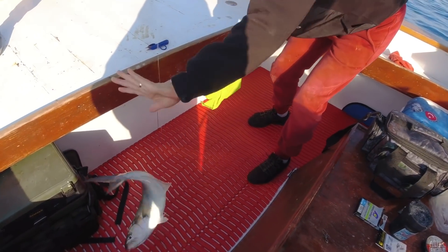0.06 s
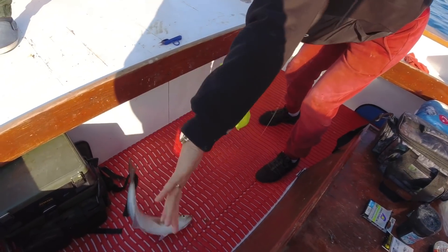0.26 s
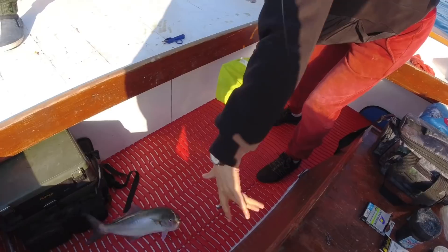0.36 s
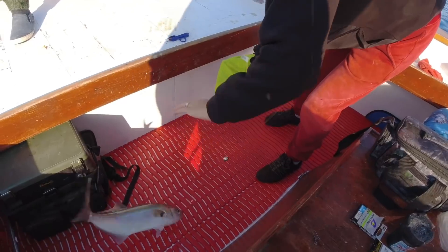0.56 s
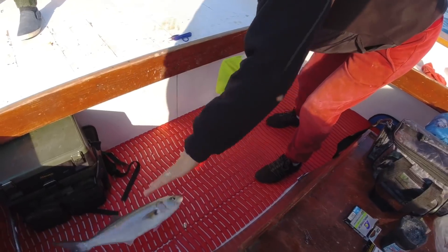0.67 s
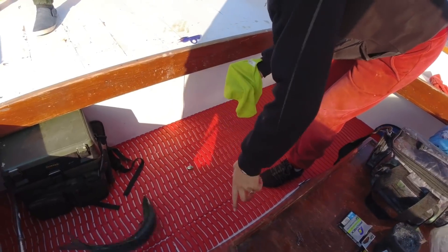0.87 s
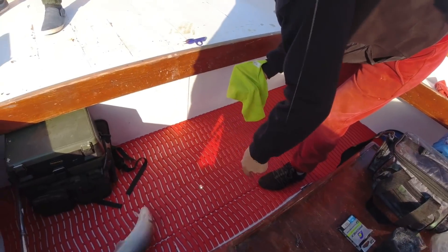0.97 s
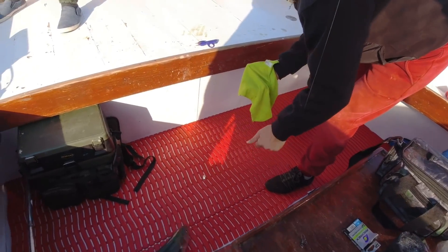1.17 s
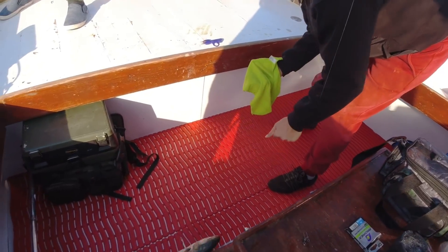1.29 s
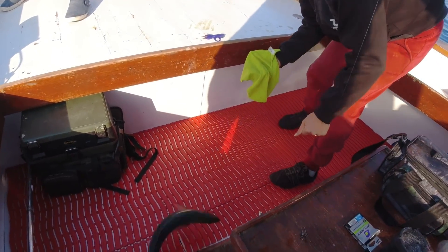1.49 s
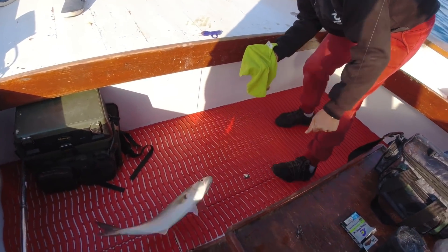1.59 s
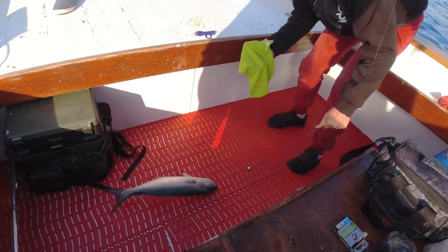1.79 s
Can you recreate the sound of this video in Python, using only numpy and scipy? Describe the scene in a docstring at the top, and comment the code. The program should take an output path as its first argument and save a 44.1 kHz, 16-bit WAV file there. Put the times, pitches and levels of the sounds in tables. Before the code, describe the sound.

A fish thrashes on the matted deck of a small open boat, wet slaps and hollow thumps in a quick flurry, then separate hard blows, recorded close in stereo over faint sea wash and hum.

```python
"""A wet fish thrashes on the ribbed mat of a small open boat: noise bursts smack and sharp clicks snap.
Little air pockets pop, the body thumps the hollow deck, and hard tail blows make the boards ring.
Pops, thumps and ringing boards are sine waves; the cockpit scatters each smack as fading noise.
Wet skin crackles and squeaks as it slides, over filtered noise for the sea and a faint hum of sines."""
import sys
import numpy as np
from scipy import signal
from scipy.fft import rfft, irfft
from scipy.io import wavfile
from scipy.ndimage import uniform_filter1d, map_coordinates

SR = 44100
rng = np.random.default_rng(int(sys.argv[2]) if len(sys.argv) > 2 else 0)


def waveform_to_disk(signal):
    """Save audio, clipped to [-1, 1], as 16-bit WAV at the path in sys.argv[1]."""
    frames = np.transpose(np.atleast_2d(signal))
    scaled = np.clip(frames, -1, 1) * 32767
    samples = np.round(scaled).astype(np.int16)
    wavfile.write(sys.argv[1], SR, samples)


N = 81585

# Tone of the sea wash: pitch_hz, level_db (relative)
SEA_COLOUR = [(20, -7), (40, 7), (70, 1.5), (130, -1.5), (200, -9.5), (400, -18), (1000, -21),
              (2000, -34.5), (4000, -38.5), (9000, -49), (15000, -58.5)]
SEA_DB, SEA_SWELL_DB = -52, 2
# Faint machine hum: pitch_hz, level_db
HUM = [(220, -70.5), (312, -64), (624, -73.5), (937, -67)]
HUM_WAVER, HUM_FLUTTER_DB = 0.007, 2  # waver is a fraction of the pitch

# Wet skin sliding on the mat: start_s, length_s, level_db
SLITHERS = [(0.177, 0.16, -56), (0.32, 0.065, -52), (0.463, 0.034, -37), (0.485, 0.05, -58),
            (0.861, 0.06, -48), (0.95, 0.024, -66), (1.06, 0.135, -60), (1.19, 0.24, -51),
            (1.374, 0.24, -56)]
# Tone of the sliding: pitch_hz, level_db (relative)
SLITHER_COLOUR = [(200, 0), (700, 11.5), (1400, -5.5), (3000, 3.5), (5000, -10), (8000, -15),
                  (15000, -23.5)]
DROPS_PER_S, DROP_SPREAD_DB = 2200, 3
# Rubbery squeaks of skin on the mat: start_s, length_s, starting_pitch_hz, rise_octaves, level_db
SQUEAKS = [(0.35, 0.017, 533, 0.07, -27.5), (.379, 0.0262, 527, 0.56, -23.5),
           (.382, 0.0086, 1235, 0, -31.5), (.871, 0.0094, 2330, 0.175, -40), (1.024, 0.018, 1340, 0, -50),
           (1.155, 0.017, 1200, .18, -38.5), (1.182, 0.007, 1095, 0, -31)]
SQUEAK_WAVER = 0.04  # fraction of the pitch

# Hard tail blows on the boards: start_s, level_db, place (0 to 2 along the deck)
WHACKS = [(0.4791, -28.5, 0.062), (.618, -30, 0), (0.8152, -26.5, 0), (1.336, -26.5, 1),
          (1.5538, -27, 1.87)]
# Ringing tones of the boards: pitch_hz, level_db at place 0, at place 1, at place 2
BOARDS = [(280, -0.5, 5, 4.5), (314.5, -2, -14, 8.5), (369.8, 2, -12.5, 1), (497, -1, -3.5, -20),
          (582.5, -5, 7, 1), (646.5, -7.5, 0, 0.5), (732, -22, 0.5, 2), (771.5, -2.5, 0.5, 2),
          (948, -5.5, -26, 3.5), (1039, -13.5, 2.5, 0), (1114, -15, -17, -2), (1265, -25, 2, -33),
          (1510, -19, -4, 1), (1802, -10, -6.5, -7)]
BOARD_T60_S = 0.12  # time to fade by 60 dB

# Body landing on the deck: start_s, thump_db, pitch_hz, contact_s, deck_ring_db, hull_boom_db
THUMPS = [(.002, -40, 71, 0.014, -47, -53.5), (0.2094, -18.5, 114.3, 0.014, -27.5, -35),
          (0.3129, -14.5, 83, 0.013, -33, -30), (0.3322, -21, 120, 0.016, -24, -30.5),
          (.350, -17.5, 142, 0.01, -41, -37), (0.373, -22.5, 120, .028, -50, -30),
          (0.411, -32.5, 225, 0.01, -54, -50), (0.477, -20.5, 153, 0.01, -33, -40),
          (0.626, -19, 124, 0.013, -24, -29), (0.813, -7.5, 126.4, 0.019, -15.5, -31),
          (0.962, -36, 74.4, 0.034, -51.5, -47), (1.095, -31.5, 131, 0.0075, -39, -60),
          (1.181, -34, 130, 0.011, -39.5, -57), (1.2315, -19.5, 132.4, .028, -31.5, -33),
          (1.35, -41, 120, 0.016, -27.5, -38.5), (1.4442, -19, 123, 0.03, -27, -35),
          (1.566, -27, 104, 0.018, -69, -39), (1.678, -44, 128, 0.018, -43, -64),
          (1.737, -39, 123, 0.017, -38.5, -33), (1.787, -28.5, 104, 0.013, -40.5, -42)]
THUMP_ATTACK_S, THUMP_RELEASE_S, RING_ATTACK_S = 0.0045, 0.0021, 0.023
# Ringing tones of the hollow deck: pitch_hz, level_db (relative), t60_s (time to fade by 60 dB)
DECK = [(123, 9, 0.28), (139.4, 6, 0.15), (186.8, 0, 0.19), (274.7, -7, 0.22), (369.4, -5, 0.17),
        (527.3, -7, 0.13)]
# Booming tones of the hull: pitch_hz, level_db (relative), t60_s
HULL = [(42.6, 9.5, 0.26), (61.8, 7.3, 0.27)]

# Air popping out from under the wet flank: start_s, pitch_hz, length_cycles, level_db
POPS = [(0.3119, 3690, 2.8, -24.5), (0.3343, 2770, 2.8, -27.5), (0.481, 3005, 4.5, -21),
        (.817, 2870, 3.4, -19.5), (0.8201, 1590, 3.1, -22.5), (0.8281, 2720, 3.1, -20.5),
        (1.339, 1470, 1.4, -16)]
POP_ROUGH = 0.07  # fraction of the pitch

# Centres of the six bands that shape a smack: pitch_hz
SLAP_BANDS_HZ = (300, 670, 1400, 2900, 6100, 12000)
# Smacks of wet skin: start_s, swell_s (as the flank lays down), then level_db in each of the six bands
SLAPS = [(0.208, .0003, -25, -36.5, -46.5, -40, -50.5, -80),
         (0.2712, 0.00076, -55, -47, -44, -47, -48.5, -54.5),
         (0.311, 0.00035, -28, -38.5, -38.5, -33.5, -50, -62),
         (0.334, 0.00078, -33, -32, -38.5, -40, -54, -58),
         (0.3537, 0.00086, -35, -31, -45, -38, -41.5, -41.5),
         (0.384, 0.0024, -39, -35.5, -44.5, -50, -48, -49),
         (0.4796, .001, -29.5, -35, -35, -35.5, -34.5, -43.5),
         (0.486, 0.0008, -38.5, -37.5, -40.5, -31.5, -55, -44),
         (0.551, .003, -45, -50.5, -63, -58, -52.5, -65.5), (0.6185, 0.004, -41, -30, -40.5, -39, -48, -43),
         (0.6222, 0.0012, -37, -35, -41, -33, -43, -44.5),
         (0.8151, 0.00023, -30, -35, -33, -33.5, -37.5, -43.5),
         (0.821, 0.0006, -23, -31.5, -43, -35, -49, -49.5),
         (0.8288, 0.00028, -33.5, -41.5, -43.5, -29, -43.5, -57),
         (0.872, 0.0023, -49, -56, -58, -53, -51.5, -54), (1.031, 0.0014, -59, -56, -64, -66, -63.5, -83),
         (1.06, 0.0051, -74, -74, -80, -61, -59, -60.5),
         (1.099, 0.0014, -51.5, -49.5, -43, -39.5, -56, -70),
         (1.156, .002, -57, -51, -52, -60.5, -55.5, -65),
         (1.1837, 0.00073, -55, -46.5, -40, -51.5, -50.5, -54),
         (1.229, .001, -48, -34.5, -45, -35, -48, -53.5), (1.243, 0.0021, -30.5, -37, -39, -57, -57, -70),
         (1.337, 0.00017, -30, -23, -26, -28, -36.5, -54.5),
         (1.411, 0.0028, -33.5, -41, -54.5, -44.5, -48, -58),
         (1.443, 0.00064, -33, -39, -40.5, -36, -48, -54.5),
         (1.479, 0.0046, -42, -46.5, -45, -48, -50, -47),
         (1.5536, 0.00012, -31, -27, -29, -33.5, -48.5, -65),
         (1.728, 0.0077, -47.5, -48.5, -53, -49, -49, -52.5)]
# Tone shared by all smacks, added to their bands: pitch_hz, level_db
SLAP_COLOUR = [(60, -12), (160, -3.5), (280, 1), (440, -3), (620, -1.5), (1000, -3), (2000, 0), (3200, 0),
               (4600, -3.5), (6200, -7), (8000, -3.5), (11000, -6), (15000, -9)]
SNAP_DB, SPLAT_DB, SPLAT_GRAIN_DB = -3.5, -4, 3
SPLAT_S, SNAP_SOFTENS_S = 0.0038, 0.0031  # a slower swell loses its snap
# Loose gear that rings with every smack: pitch_hz, level_db (relative), t60_s
FITTINGS = [(1610, 0.5, 0.08), (2470, -0.5, 0.089), (2890, -4.5, 0.06), (3580, 2, 0.1), (4200, -3.5, 0.092),
            (5080, -1.5, 0.091), (6200, 2.5, 0.19), (7810, 9, 0.092), (9430, 10, 0.11)]
FITTINGS_DB, FITTINGS_SHIFT = -34.5, 0.012  # shift is a fraction of the pitch
# Fading of the cockpit scatter: pitch_hz, t60_s
COCKPIT_T60 = [(250, 0.28), (700, 0.21), (1500, 0.16), (3000, 0.095), (7000, 0.14), (14000, 0.12)]
COCKPIT_DB, COCKPIT_TREBLE_DB, COCKPIT_RISE_S = -0.5, 3, 0.0022
ECHO_DB, ECHO_NEAR_S, ECHO_FAR_S = -6, 0.001, 0.005

# Where the fish lies, heard as a later arrival at the right microphone: time_s, lag_microseconds
BEARING = [(.3, 8), (.5, 36), (1.1, 36), (1.3, 2), (1.75, 10)]
WIDTH_HZ, WIDTH, BASS_WIDTH = 3640, 0.98, 0.046  # stereo difference, as shares of the side signal
TOP_HZ = 16000


def undb(db):
    """Turn decibels into gain."""
    return 10 ** (np.asarray(db) / 20)


def unit(x):
    """Scale to an average (rms) level of 1."""
    return x / np.sqrt(np.mean(x ** 2))


def curve(points, hz):
    """Read values between (pitch, value) points, with pitch on a logarithmic axis."""
    p = np.array(points, float)
    return np.interp(np.log(np.maximum(hz, 1)), np.log(p[:, 0]), p[:, 1])


def colour(x, gain_db):
    """Filter with the response gain_db(hz), so that nothing sounds before its cause."""
    n = x.shape[-1]
    hz = np.arange(n + 1) * SR / (2 * n)
    # folding the cepstrum onto positive times gives a minimum-phase filter
    cepstrum = irfft(np.log(undb(gain_db(hz))))
    cepstrum[1:n] *= 2
    cepstrum[n + 1:] = 0
    return irfft(rfft(x, 2 * n) * np.exp(rfft(cepstrum)))[..., :n]


def spread(mid, side):
    """Diffuse sound at two close microphones: alike in the bass, different in the treble."""
    highpass = signal.butter(1, WIDTH_HZ, "high", fs=SR, output="sos")
    side = BASS_WIDTH * side + WIDTH * signal.sosfilt(highpass, side)
    return np.array([mid + side, mid - side])


def add(out, start, x):
    """Mix x in at a time in seconds."""
    i = max(int(start * SR), 0)
    out[..., i:i + x.shape[-1]] += x[..., :max(N - i, 0)]


def walk(rate):
    """Smooth random wander with rms 1, taking about `rate` new values a second."""
    k = int(SR / rate)
    steps = np.repeat(rng.standard_normal(N // k + 1), k)
    return unit(uniform_filter1d(uniform_filter1d(steps, k), k)[:N])


def fade(t, t60):
    """Exponential fade, down by 60 dB after t60 seconds."""
    return np.exp(-np.log(1000) * t / t60)


def ring(modes, t):
    """Free ringing: a sum of fading sines from (pitch_hz, level_db, t60_s)."""
    return sum(undb(db) * np.sin(2 * np.pi * hz * t) * fade(t, t60) for hz, db, t60 in modes)


def background():
    """Low wash of sea and air as filtered noise that swells, with a faint wavering hum of sines."""
    noise = spread(*rng.standard_normal((2, N)))
    sea = unit(colour(noise, lambda hz: curve(SEA_COLOUR, hz)))
    clock = np.cumsum(1 + HUM_WAVER * walk(11)) / SR  # time that runs a little unevenly
    hum = np.zeros(N)
    for hz, db in HUM:
        loudness = np.sqrt(2) * undb(db + HUM_FLUTTER_DB * walk(25.2))
        hum += loudness * np.sin(2 * np.pi * hz * clock)
    return sea * undb(SEA_DB + SEA_SWELL_DB * walk(3.56)) + hum


def slithers():
    """Wet skin drags over the ribs: a dense crackle of tiny releases."""
    level = np.zeros(N)
    for start, length, db in SLITHERS:
        add(level, start, undb(db) * signal.windows.tukey(int(length * SR), 0.5))
    happens = rng.random((2, N)) < DROPS_PER_S / SR
    drops = happens * rng.standard_normal((2, N))
    drops = drops * undb(DROP_SPREAD_DB * np.clip(rng.standard_normal((2, N)), -2, 2))
    return level * unit(colour(spread(*drops), lambda hz: curve(SLITHER_COLOUR, hz)))


def squeaks():
    """Skin sticks and slips for a few cycles; where it tightens, the pitch rises."""
    out, t = np.zeros(N), np.arange(SR // 10) / SR
    for start, length, hz, rise, db in SQUEAKS:
        glide = 2 ** (rise * np.minimum(t / length, 1))
        pitch = hz * glide * (1 + SQUEAK_WAVER * walk(580)[:len(t)])
        u = 4 * t / length
        swell = u * np.exp(1 - u)  # loudest a quarter of the way through the length
        add(out, start, undb(db) * swell * np.sin(2 * np.pi * np.cumsum(pitch) / SR))
    return out


def whacks():
    """The tail hits the boards; the place sets how loud each tone is, and neighbours swing oppositely."""
    out, t = np.zeros(N), np.arange(SR // 2) / SR
    for start, db, place in WHACKS:
        modes = [(hz, np.interp(place, np.arange(len(dbs)), dbs), BOARD_T60_S) for hz, *dbs in BOARDS]
        add(out, start, undb(db) * (ring(modes[1::2], t) - ring(modes[::2], t)))
    return out


def thumps():
    """The deck swings while the body presses on it, and its ringing builds up with the hull's boom."""
    out, t = np.zeros(N), np.arange(SR) / SR
    build_up = 1 - np.exp(-t / RING_ATTACK_S)
    deck, hull = ring(DECK, t) * build_up, ring(HULL, t) * build_up
    for start, db, hz, contact, deck_db, hull_db in THUMPS:
        attack = np.sin(np.pi / 2 * np.minimum(t / THUMP_ATTACK_S, 1))
        release = np.cosh(np.minimum(np.maximum(t - contact, 0) / THUMP_RELEASE_S, 20))
        push = attack / release * np.sin(2 * np.pi * hz * t)
        swing = np.gradient(push, t) / (2 * np.pi * hz)
        add(out, start, -undb(db) * swing + undb(deck_db) * deck - undb(hull_db) * hull)
    return out


def pops():
    """Small pockets of air burst from under the skin, each a few ragged cycles."""
    out, t = np.zeros(N), np.arange(SR // 20) / SR
    for start, hz, length, db in POPS:
        ragged = unit(uniform_filter1d(rng.standard_normal(len(t)), size=12))
        cycles = np.cumsum(hz * (1 + POP_ROUGH * ragged)) / SR
        u = cycles / length
        burst = np.sqrt(2 * np.abs(u)) * np.exp(0.5 - u)
        add(out, start, undb(db) * burst * np.sin(2 * np.pi * cycles))
    return out


def cockpit(t):
    """Dense reflections from deck and sides: noise whose bands each die at their own pace."""
    noise = rfft(spread(*rng.standard_normal((2, len(t)))))
    hz = np.arange(noise.shape[1]) * SR / len(t)
    treble = undb(COCKPIT_TREBLE_DB * np.minimum(hz / (SR / 5), 1))
    out = 0
    for k, (_, t60) in enumerate(COCKPIT_T60):
        # 1 at this band's centre, sloping to 0 at its neighbours
        share = curve([(f, j == k) for j, (f, _) in enumerate(COCKPIT_T60)], hz)
        out = out + irfft(noise * share * treble, len(t)) * fade(t, t60)
    return out * (1 - np.exp(-t / COCKPIT_RISE_S)) / np.sqrt(SR / 100)


def fittings(t):
    """Loose gear rings briefly, its pitches shifted a little at random each time."""
    shift = 1 + FITTINGS_SHIFT * rng.standard_normal()
    modes = [(hz * shift, db + FITTINGS_DB, t60) for hz, db, t60 in FITTINGS]
    return ring(modes, t) / np.sqrt(len(FITTINGS))


def echoes(x, count):
    """A few near surfaces repeat the blow within milliseconds and give it a hollow, banded colour."""
    out = x.copy()
    for lag in rng.uniform(ECHO_NEAR_S, ECHO_FAR_S, count):
        out += undb(ECHO_DB) * np.pad(x, ((0, 0), (int(lag * SR), 0)))[:, :x.shape[1]]
    return out / np.sqrt(1 + count * undb(ECHO_DB) ** 2)


def slaps():
    """Each smack swells into a grainy wet splat, snaps if fast, shakes the gear and scatters around."""
    out, t = np.zeros((2, N)), np.arange(SR // 2) / SR
    lead = SR // 25  # samples of room for the swell before contact
    since = t - lead / SR
    for start, swell, *levels in SLAPS:
        grain = unit(undb(SPLAT_GRAIN_DB * walk(1500)[:len(t)]))
        contact = np.exp(-np.maximum(since / SPLAT_S, -since / swell)) * grain
        splat = spread(*rng.standard_normal((2, len(t)))) * contact / np.sqrt(SPLAT_S * SR / 2)
        shaken = fittings(t)
        tail = undb(COCKPIT_DB) * cockpit(t) + shaken
        tail = np.pad(tail, ((0, 0), (lead, 0)))[:, :len(t)]
        blow = echoes(undb(SPLAT_DB) * splat + tail, count=3)
        blow[:, lead] -= undb(SNAP_DB) * np.exp(-swell / SNAP_SOFTENS_S)  # one-sample click
        # lower bands are narrower, so they get more gain
        bands = [(hz, db + 10 * np.log10(SR * SR / 100 / hz)) for hz, db in zip(SLAP_BANDS_HZ, levels)]
        smack = colour(blow, lambda hz: curve(bands, hz) + curve(SLAP_COLOUR, hz))
        add(out, start - lead / SR, smack)
    return out


def scene():
    """The fish lies a little to the left, by a late right channel; the sea is all round."""
    left, right = slaps() + pops() + thumps() + whacks() + slithers() + squeaks()
    n = np.arange(N)
    lag = np.interp(n / SR, *np.array(BEARING).T) * SR / 1e6  # microseconds to samples
    right = map_coordinates(right, [n - lag], order=3, mode="nearest")
    return np.array([left, right]) + background()


def record(dry):
    """Filters take away the deepest bass and the very top."""
    dry = signal.sosfilt(signal.butter(2, 25, "high", fs=SR, output="sos"), dry)
    return signal.sosfilt(signal.ellip(8, 0.2, 70, TOP_HZ, fs=SR, output="sos"), dry)


dry = scene()
out = record(dry)
waveform_to_disk(out)
```